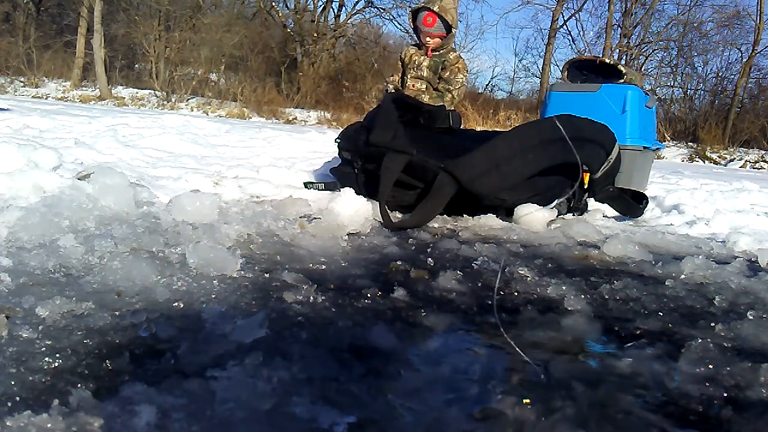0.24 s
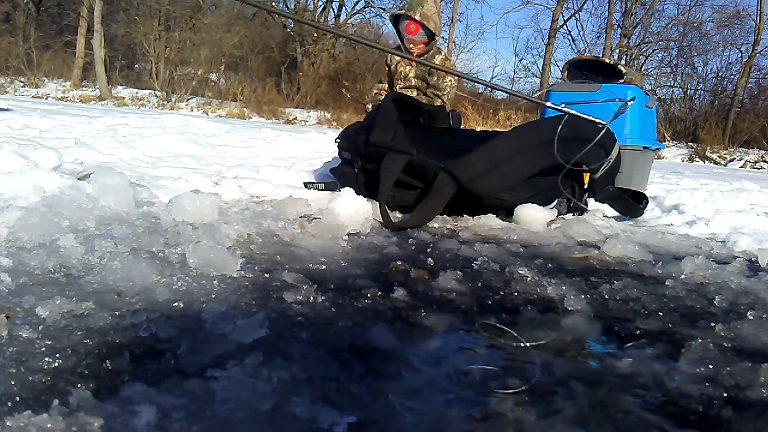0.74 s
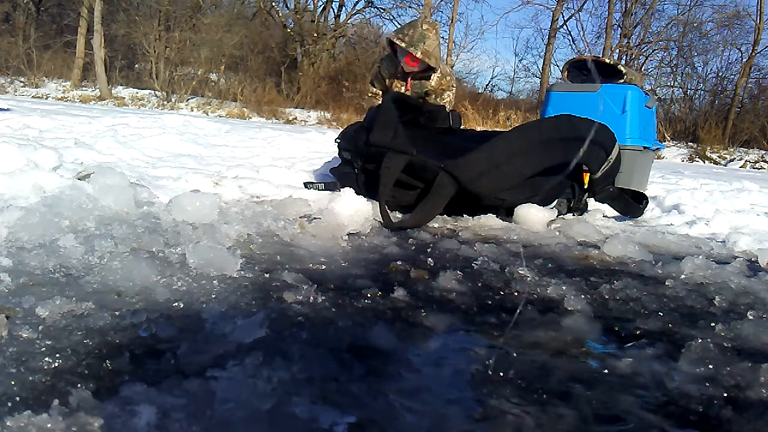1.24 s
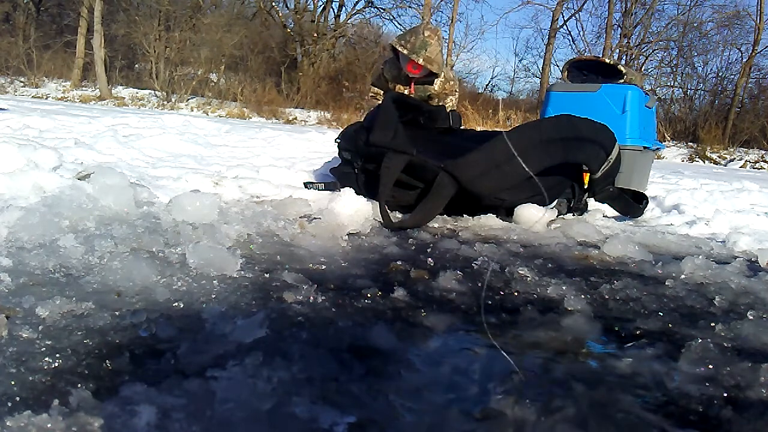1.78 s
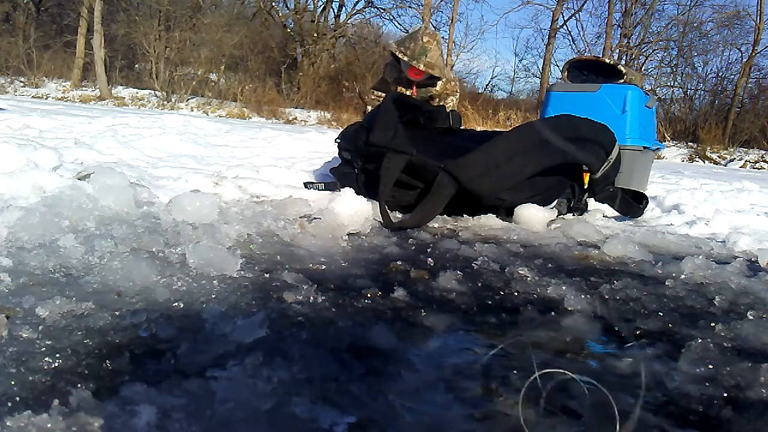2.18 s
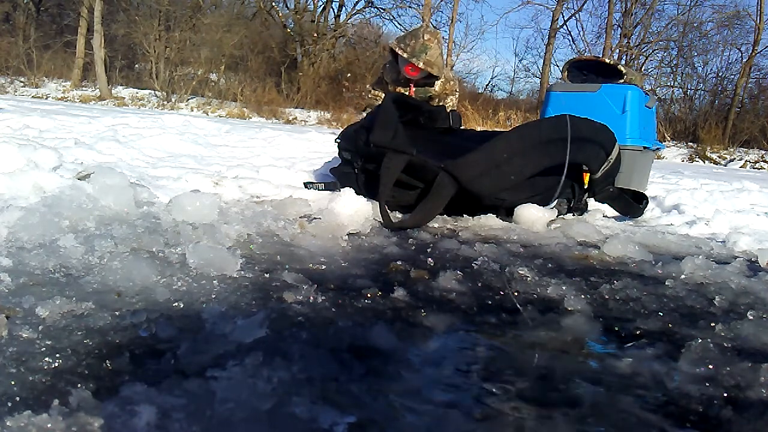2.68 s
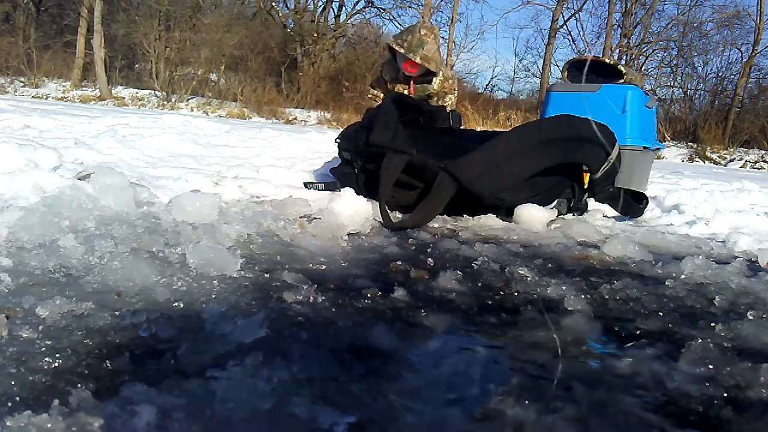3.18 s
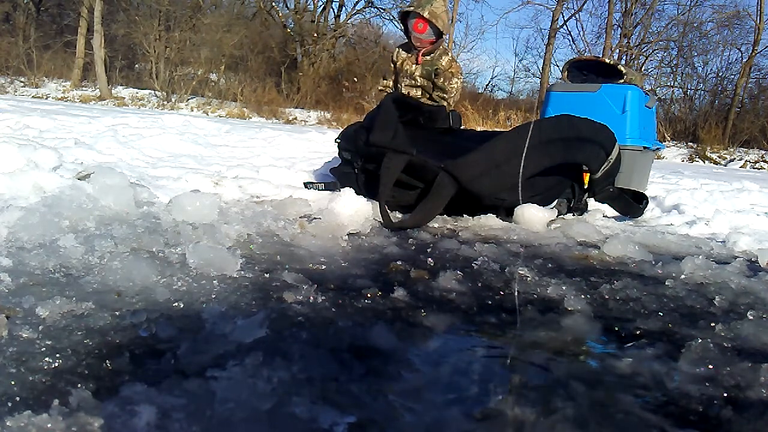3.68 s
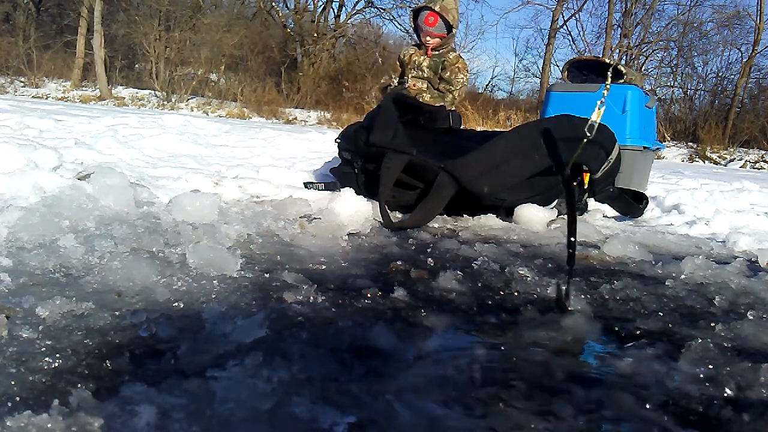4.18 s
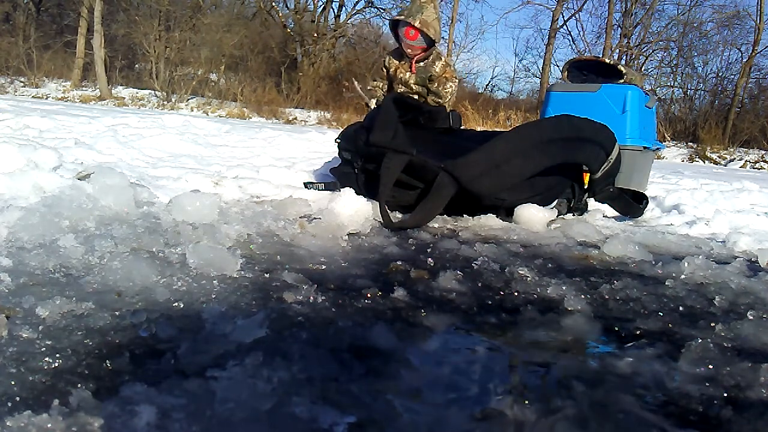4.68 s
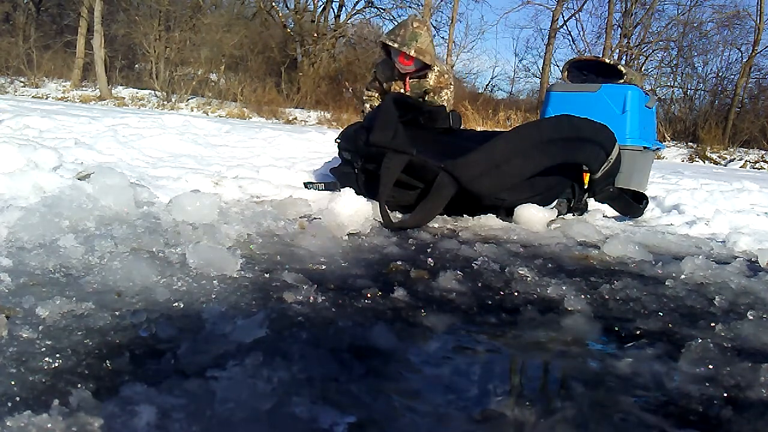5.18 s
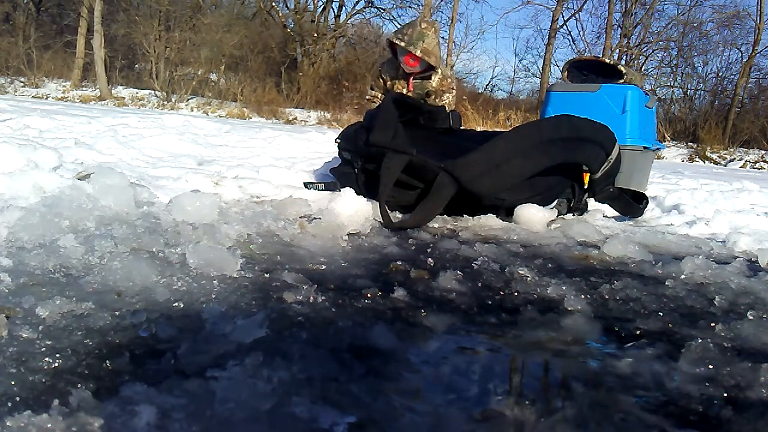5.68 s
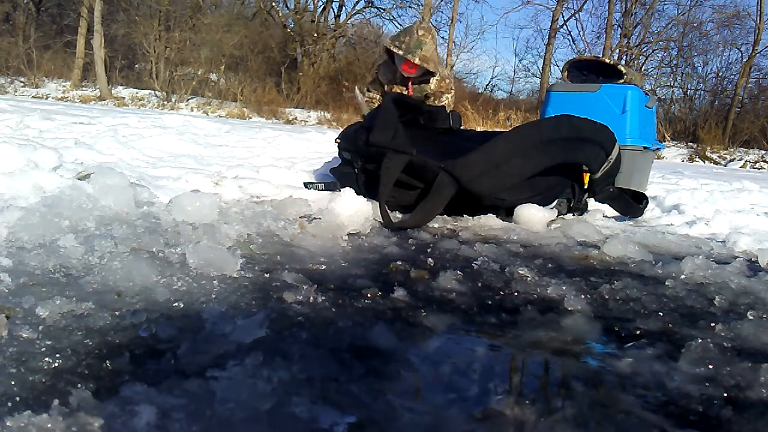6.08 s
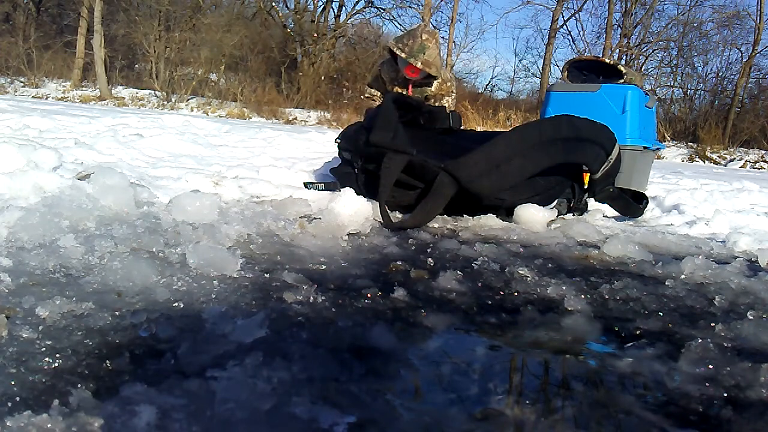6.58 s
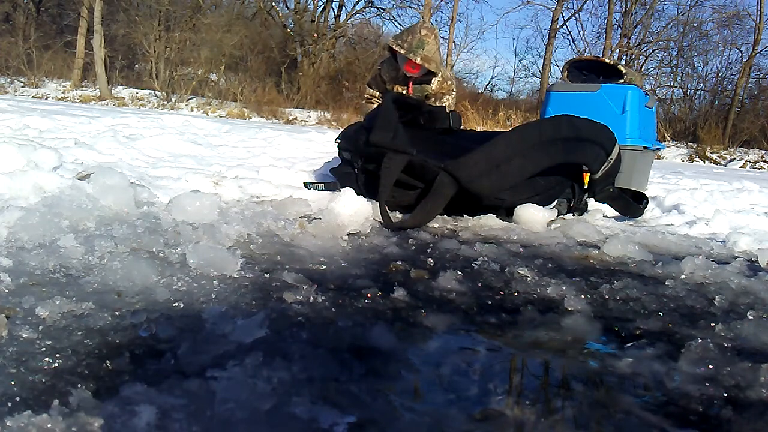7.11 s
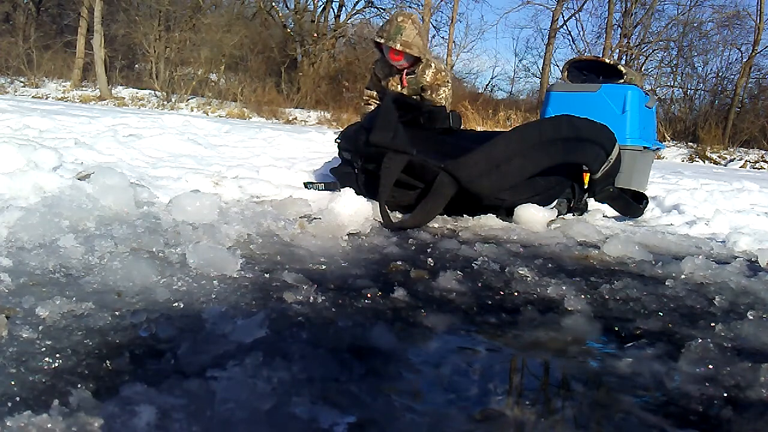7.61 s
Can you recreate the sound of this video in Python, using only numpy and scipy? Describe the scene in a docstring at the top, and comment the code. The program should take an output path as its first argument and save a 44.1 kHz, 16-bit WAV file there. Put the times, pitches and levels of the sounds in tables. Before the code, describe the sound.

Light wind, low open-air murmur and faint ticking ice lie under everything, with a far engine hum and an exhaust drone that fades by about 1.8 s. Soft bumps and swishes of line and clothing come at 0.1-1.1 s. From 1.2 to 3.4 s a steel chisel about four metres off strikes pond ice nine times, some 0.28 s apart, strongest near 2.6 s. Each blow is a quick falling chirp through the ice, then a dry crack, short bar clink, spray of chips and fizzing slush, with a diffuse echo from shore trees. Some blows slip into a second small crunch. A loose chunk knocks at 3.5 s; cloth rustles around 4 s, tackle clinks at 4.15 s, ice bits click at 4.6-5 s. Nine more blows follow from 5.0 to 7.4 s, about 0.3 s apart, with low bumps and a stronger breath of wind near 6.9 s. Slush settles into quiet air.

```python
"""Over light wind, a far engine and faint ice crackle, line and clothing swish and an exhaust drone fades.
From 1.2 s a steel chisel chops pond ice about four metres away: nine blows, a pause, nine more from 5.0 s.
Each blow comes first as a falling chirp, dispersed by the ice sheet, then as a crack through the air.
Decaying bar modes clink; noise bursts give spray, loose chunks and a diffuse answer from the shore trees.
In the pause tackle clinks and bits of ice click; slush swells and settles after each blow."""
import sys
import numpy as np
from scipy import signal
from scipy.fft import rfft, irfft
from scipy.io import wavfile
from scipy.ndimage import uniform_filter1d

SR = 44100
rng = np.random.default_rng(int(sys.argv[2]) if len(sys.argv) > 2 else 0)


def store_wav(level_fs):
    """Save 16-bit WAV to argv[1]."""
    pcm = np.round(np.clip(np.atleast_2d(level_fs), -1, 1) * 32767)
    wavfile.write(sys.argv[1], SR, pcm.T.astype(np.int16))


N = 346185
SIZE = 8192  # samples of one short sound
HZ, AGE_S, CLOCK_S = np.fft.rfftfreq(SIZE, 1 / SR), np.arange(SIZE) / SR, np.arange(N) / SR

# chisel blows, relative levels: crack arrival t/s, ice wave/dB, hardness (wave treble)/dB,
# knock/dB, crack/dB, snap/dB, fizz/dB, bar clink/dB
BLOWS = [(1.191, -31, -12, -37, -48.5, -40.5, -40, -38),
         (1.5089, -33.5, -14, -37, -46, -49.5, -42.5, -36.5),
         (1.7754, -28.5, -5, -25, -42, -37, -39.5, -25.5),
         (2.0465, -29, -11, -29.5, -43.5, -45, -36.5, -31.5),
         (2.3291, -30, -4.5, -37, -34.5, -41, -35.5, -32),
         (2.6059, -23.5, -5.5, -27.5, -27, -29, -31.5, -21), (2.8895, -33, 4, -24, -38, -28, -36, -23),
         (3.1505, -29, -6.5, -27, -35.6, -30, -41.5, -36), (3.416, -34, 1, -26.5, -41.5, -41, -39, -32),
         (5.0154, -32.5, -3, -29, -49, -38, -43, -35.5), (5.3385, -30, -7, -28.5, -49.5, -49, -42.5, -38),
         (5.6464, -26.5, -17.5, -39.5, -29.5, -43, -34.5, -30.5),
         (5.933, -30, -16.5, -40, -43.5, -48.5, -43, -38),
         (6.2256, -29.5, 2.5, -38.5, -38, -42, -35.5, -57), (6.5327, -24.5, 1, -22, -35, -34, -32, -26.5),
         (6.8338, -26.5, -11, -25.5, -41.5, -27.5, -34, -59),
         (7.147, -33, -2, -31, -42.5, -26.5, -30.5, -37), (7.433, -33, 4, -56, -41.5, -27, -36.5, -27.5)]
# open-air murmur spectrum: f/Hz, relative density/dB
AIR = [(71, -55), (120, -28.5), (181, 2.5), (233, -0.5), (270, -1), (353, -1.5), (391, -6), (440, -2),
       (474, -4), (3330, -15), (4100, -12.5), (5330, -78), (9020, -120)]
# hiss spectrum: f/Hz, relative density/dB
HISS = [(200, 10), (4000, 10), (6000, -6), (7800, 7.5), (10000, 3.5), (13000, -1), (16000, -6)]


def gain_of(db):
    """Decibels to amplitude."""
    return 10 ** (np.asarray(db) / 20)


def evened(x):
    """Scales to rms 1."""
    return x / np.sqrt(np.mean(x ** 2) + 1e-20)


def unit(x):
    """Scales to energy 1."""
    return x / (np.linalg.norm(x) + 1e-12)


def read(points, hz):
    """A spectrum, joined by straight lines over log frequency."""
    f, value = np.transpose(points)
    return np.interp(np.log(hz + 1), np.log(f + 1), value)


def curve(rows, t_s, axis=1):
    """One column of a time table at the times t_s."""
    rows = np.array(rows)
    return np.interp(t_s, rows[:, 0], rows[:, axis])


def add(mix, start_s, sound):
    """Adds a sound at start_s."""
    part = mix[max(round(start_s * SR), 0):][:len(sound)]
    part += sound[:len(part)]


def causal(db):
    """Minimum-phase response with these gains: it rings only after its cause."""
    log_gain = np.log(gain_of(np.maximum(db, -100)))
    circle = np.concatenate([log_gain, log_gain[-2:0:-1]])
    return np.exp(np.conj(signal.hilbert(circle)))[:len(db)]


def coloured(x, db):
    """Passes x through a causal filter with gains db."""
    return signal.fftconvolve(x, irfft(causal(db)))[:len(x)]


def grains(spread_db, size=SIZE):
    """Dense clicks of unequal strength, rms 1."""
    strength_db = spread_db * np.minimum(rng.exponential(1, size), 5)
    return evened(rng.standard_normal(size) * gain_of(strength_db))


def wander(size, count):
    """Smooth random curve of rms 1 that changes about every count samples."""
    smooth = uniform_filter1d(rng.standard_normal(size), count)
    return evened(uniform_filter1d(smooth, count))


def noise(db, flutter_db, grain_db=-0.6):
    """Grainy coloured noise, rms 1, whose level flutters at random."""
    steady = coloured(grains(grain_db, size=N), db)
    return evened(steady * gain_of(flutter_db * wander(N, count=500)))


def outdoors(low_db=1.5, upper_db=-0.7, hiss_db=-79, wind_db=2.0, flicker_db=3.5, waver_db=-0.43):
    """Open air and wind on the microphone; low murmur wavers slowly, all but the wind flickers."""
    # murmur course, relative: t/s, low part/dB, upper part/dB
    air_level = [(0.0, -59.5, -62.5), (2.71, -62, -63.5), (4.57, -67.5, -67.5), (5.2, -65.5, -61),
                 (6.91, -66.5, -65.5), (7.85, -68.5, -70)]
    # wind spectrum: f/Hz, relative density/dB
    wind_colour = [(20, -17.5), (40, -11.5), (60, -10), (85, -8), (120, -23.5), (250, -13), (1000, -87)]
    # wind course, relative; strongest near 6.9 s: t/s, level/dB
    wind_level = [(0, -73), (2.4, -72.5), (4.6, -74), (6.2, -71.5), (6.85, -67), (7.85, -81)]
    air = read(AIR, HZ) + read([(60, -11.5), (150, 12.5), (4100, 14), (4600, -29), (9000, -62)], HZ)

    low = noise(air + read([(800, -6.0), (1400, -13.5), (3000, -51.0)], HZ), 0.4)
    low = low * gain_of(curve(air_level, CLOCK_S) + low_db + waver_db * wander(N, count=3000))
    upper = noise(air + read([(400, -19.5), (1100, -10.5)], HZ), 0.36)
    upper = upper * gain_of(curve(air_level, CLOCK_S, axis=2) + upper_db)
    hiss = noise(read(HISS, HZ), 0.55, grain_db=10.0) * gain_of(hiss_db)
    wind = noise(read(wind_colour, HZ), 1.5) * gain_of(curve(wind_level, CLOCK_S) + wind_db)
    flicker = gain_of(flicker_db * wander(N, count=220))
    return (low + upper + hiss) * flicker + wind


def engine(hum_db=6.5):
    """Far engine: a sine at the firing rate, and noise in broad exhaust resonances that fades."""
    # speed drops, later picks up: t/s, firing f/Hz, relative level/dB
    firing = [(0, 85, -76), (1.45, 82, -73), (1.9, 71, -68.5), (3.1, 67, -73), (3.7, 67, -79.5),
              (4.8, 85, -87), (7.85, 76, -86)]
    # exhaust resonances: f/Hz, width/Hz, relative level/dB
    resonances = [(180, 6.3, -7), (272.6, 6.5, -1.5), (394.8, 13, -3)]
    # drone course: t/s, level/dB
    drone_level = [(0, -60), (1.2, -62.5), (1.8, -87), (2.6, -86), (7.85, -87)]
    turns = np.cumsum(curve(firing, CLOCK_S)) / SR
    hum = np.sin(2 * np.pi * turns) * gain_of(curve(firing, CLOCK_S, axis=2) + hum_db)
    pipe = sum(gain_of(db) / (1 + (2 * (HZ - hz) / width_hz) ** 2) for hz, width_hz, db in resonances)
    drone = noise(20 * np.log10(pipe), 0.92) * gain_of(curve(drone_level, CLOCK_S))
    return hum + drone


def crackle(level_db=-70, clicks_per_s=60):
    """Slush and ice tick faintly: random short noise decays."""
    strength_db = 3.5 * np.minimum(rng.exponential(1, N), 2.5)
    clicks = (rng.random(N) < clicks_per_s / SR) * gain_of(strength_db)
    ticks = signal.fftconvolve(clicks, np.exp(-AGE_S / 0.0012))[:N] * rng.standard_normal(N)
    colour = [(150, -7), (500, 7), (3800, 15.5), (6000, -26), (8000, 1.5), (16000, -10)]
    return gain_of(level_db) * evened(coloured(ticks, read(colour, HZ)))


def swishes():
    """Line and clothing brush by: each stroke is one arch of grainy hiss over a soft rustle."""
    # strokes: top t/s, length/s, hiss/dB, rustle/dB
    strokes = [(0.224, 0.19, -68, -63), (0.657, 0.42, -66.5, -59), (1.07, 0.14, -60.5, -49),
               (3.924, 0.088, -67, -56), (4.175, 0.4, -63, -58)]
    hiss, rustle = np.zeros((2, N))
    for top_s, length_s, hiss_db, rustle_db in strokes:
        arch = np.hanning(round(length_s * SR))
        add(hiss, top_s - length_s / 2, gain_of(hiss_db) * arch)
        add(rustle, top_s - length_s / 2, gain_of(rustle_db) * arch)
    hiss = hiss * noise(read(HISS, HZ), 2.5, grain_db=6.0)
    return hiss + rustle * noise(read(AIR, HZ) + read([(400, 1.5), (3000, -6)], HZ), 4.5)


def small_sounds(tick_db=38.0, tick_decay_s=0.0063, bump_decay_s=0.0036):
    """Bits of ice click as decaying noise; dull bumps are short pushes through a narrow band."""
    # ice clicks, relative levels: t/s, low/dB, middle/dB, high/dB
    clicks = [(4.622, -50, -48, -62.5), (4.661, -64, -64, -73), (4.736, -56, -57.5, -82),
              (4.959, -54, -61, -88), (5.168, -53, -54, -58.5), (5.496, -60, -52, -70),
              (5.532, -77, -52, -68), (7.554, -56, -64, -76)]
    # dull bumps: t/s, peak/dB, f/Hz
    bumps = [(0.079, -49, 149), (.09, -48.5, 68), (0.258, -54, 66), (6.341, -51, 59), (6.669, -40.5, 200),
             (6.679, -46, 67), (6.932, -47.5, 59), (6.979, -50.5, 62), (7.241, -51.5, 54)]
    out = np.zeros(N)
    for s, low, middle, high in clicks:
        colour = [(100, low - 25), (650, low + 3), (1600, middle - 3), (3600, middle),
                  (6000, high - 9), (8000, high), (11000, high - 9), (16000, high - 14)]
        burst = unit(grains(0.79) * np.exp(-AGE_S / tick_decay_s))
        add(out, s, coloured(burst, tick_db + read(colour, HZ)))
    for s, db, hz in bumps:
        push = grains(0.72) * AGE_S / bump_decay_s * np.exp(-AGE_S / bump_decay_s)
        thud = coloured(push, read([(hz / 3, -28), (hz, 0), (hz * 3, -30), (hz * 10, -70)], HZ))
        add(out, s, gain_of(db) * thud / abs(thud).max())
    return out


def loose_bits(clink_decay_s=0.0025, chunk_decay_s=0.0019):
    """Tackle clinks on a close pair of modes; loose chunks land with a short knock."""
    # metal tackle on the line: t/s, relative level/dB, upper mode f/Hz
    tackle = [(.799, -55, 7900), (4.156, -39, 8230)]
    # chunks knocking down after a blow: t/s, peak/dB
    chunks = [(1.211, -32), (3.4768, -32), (5.085, -35), (6.866, -33)]
    # chunk spectrum: f/Hz, relative level/dB
    chunk_colour = [(150, -5), (420, 13.5), (700, 14.5), (1100, 3), (1800, -13), (3800, -15), (7500, -11),
                    (16000, -16)]
    out = np.zeros(N)
    for s, db, hz in tackle:
        pair = np.sin(2 * np.pi * hz * AGE_S) + np.sin(2 * np.pi * hz * 0.93 * AGE_S)
        add(out, s, gain_of(db) * pair * np.exp(-AGE_S / clink_decay_s) * (1 - np.exp(-AGE_S / .002)))
    for s, db in chunks:
        knock = coloured(grains(1.1) * np.exp(-AGE_S / chunk_decay_s), read(chunk_colour, HZ))
        add(out, s, gain_of(db) * knock / abs(knock).max())
    return out


def slush(level_db=-65, peak_s=0.08):
    """Each blow stirs the slush, whose fizz swells to a top after peak_s and settles; powers add."""
    # slush spectrum: f/Hz, relative density/dB
    slush_colour = [(120, -14), (250, 3), (700, -1), (1500, -14), (3800, -14), (6000, -11), (8000, -3),
                    (16000, -11.5)]
    age = np.arange(SR) / SR / peak_s
    power = np.zeros(N)
    for s, *_ in BLOWS:
        add(power, s, (age * np.exp(1 - age)) ** 2)
    fizzing = noise(read(slush_colour, HZ), 2.5, grain_db=4)
    return gain_of(level_db) * np.sqrt(power) * fizzing


def shore(x, echo_db=-21.0, size=256):
    """Trunks and branches scatter each blow into a diffuse echo: noise shaped by its delayed power."""
    # echo spectrum: f/Hz, relative level/dB
    shore_colour = [(200, -8), (700, -6), (1500, -3), (2700, 5.5), (4000, 1.5), (6000, -8.5), (8000, 0.5),
                    (15000, 4.5)]
    # echo course: t/s, relative level/dB
    shore_course = [(0, -22), (.04, 25.5), (.07, 16), (.125, 25.5), (.15, 14), (.18, 6.5), (.3, -29),
                    (.6, -58.5)]
    hz, t_s, z = signal.stft(x, SR, nperseg=size)
    course = unit(gain_of(curve(shore_course, t_s[t_s < shore_course[-1][0]])))
    blurred = uniform_filter1d(abs(z) ** 2, size=7, axis=0)
    power = signal.fftconvolve(blurred, course[None] ** 2, axes=1)[:, :len(t_s)]
    scatter = signal.stft(grains(2.0, size=N), SR, nperseg=size)[2]
    echo = scatter * np.sqrt(abs(power) / np.mean(abs(scatter) ** 2))
    echo = echo * gain_of(echo_db + read(shore_colour, hz))[:, None]
    return signal.istft(echo, SR, nperseg=size)[1][:N]


def chips(clump_db=-0.5, splinter_share=0.37, splinters_per_s=700):
    """Fine spray scatters over the ice in clumps, with sparser splinters among it."""
    # spray spectrum: f/Hz, relative level/dB
    chip_colour = [(300, -4.5), (800, 3), (1600, -19.5), (3000, -11.5), (3900, 8), (5600, -3), (7600, 1.5),
                   (10000, -5.5), (13000, -14.5), (16000, -15)]
    # spray course after the blow: t/s, relative level/dB
    spray = [(0, -32), (.009, 1), (.017, 1), (.03, 5.5), (.045, -4.5), (.065, -16), (.12, -40)]
    specks = grains(3.6)
    dust = specks * gain_of(clump_db * wander(SIZE, count=110))
    splinters = evened(rng.standard_normal(SIZE) * (rng.random(SIZE) < splinters_per_s / SR))
    mixed = coloured(dust + splinter_share * splinters, read(chip_colour, HZ))
    return evened(mixed) * gain_of(curve(spray, AGE_S))


def bar(clink_db, snap_db, ping_db=-4, ping_growth=5, hard_snap_db=-28):
    """Bar modes damped by hands and ice; grip shifts the low ones, a sharp snap wakes the upper ones."""
    # steel bar modes: nominal f/Hz, relative level/dB, t60/s
    modes = [(1815, -16, .05), (2525, -13, .05), (3680, -11, .025), (3880, -1, .035), (4000, -3, .03),
             (5400, -2, .04), (5610, -2, .04), (7380, -12, .09), (8180, -9, .08), (9200, -14, .07),
             (11540, -18, .06), (11940, -15, .07), (13500, -18, .04), (13750, -18, .04)]
    hz, db, t60_s = np.transpose(modes)[:, :, None]
    upper = hz > 4700
    ping_drive_db = hard_snap_db + ping_db + ping_growth * (snap_db - hard_snap_db)
    drive_db = np.where(upper, ping_drive_db, clink_db)
    detune, uneven, phase = rng.standard_normal((3, len(modes), 1))
    mode_hz = hz * (1 + np.where(upper, .0016, .009) * detune)
    level = gain_of(drive_db + db + 0.52 * uneven - 60 * AGE_S / t60_s)
    ringing = level * np.sin(2 * np.pi * (mode_hz * AGE_S + phase))
    return ringing.sum(0) * (1 - np.exp(-AGE_S / 0.00085)) ** 2


def fracture(levels_db, rise_s=0.0013, crumble_s=0.0067, crumble_share=0.34, lump_db=2):
    """The edge bites: an uneven burst of tiny cracks, then brief crumbling."""
    # centres of knock, crack, snap and fizz: f/Hz
    centres_hz = [800, 2400, 6000, 10000]
    # fracture spectrum: f/Hz, relative level/dB
    fracture_colour = [(60, 6), (150, 16), (450, 39.5), (800, 33.5), (1250, 41), (1550, 30.5), (2400, 37.5),
                       (3500, 40.5), (5500, 37), (6500, 36), (8200, 37), (10000, 29.5), (13000, 17),
                       (16000, 18.5)]
    bite = (AGE_S / rise_s) ** 2 * np.exp(-AGE_S / rise_s)
    crumbling = crumble_share * np.exp(-AGE_S / crumble_s) * (1 - np.exp(-AGE_S / rise_s)) ** 2
    cracks = grains(1.1)
    burst = unit(cracks * (bite + crumbling) * gain_of(lump_db * wander(SIZE, count=30)))
    return coloured(burst, read(fracture_colour, HZ) + read(list(zip(centres_hz, levels_db)), HZ))


def slips():
    """After some blows the edge slips deeper: a smaller fracture and one more bar clink."""
    # slips: t/s, crunch/dB, bar clink/dB
    bites = [(1.5157, -64, -33.5), (1.7865, -58, -32.5), (2.3378, -58, -31), (2.6111, -62, -31),
             (2.898, -35, -25.5), (3.160, -54, -30.5), (3.4251, -35.5, -25), (6.866, -42.5, -47),
             (7.163, -39, -49)]
    # offsets from the crunch level: knock/dB, crack/dB, snap/dB, fizz/dB
    slip_colour = [3.5, -10.5, -7, -14]
    out = np.zeros(N)
    for s, crunch, clink in bites:
        add(out, s, fracture(crunch + np.array(slip_colour)) + bar(clink, crunch))
    return out


def far_return(delay_s=0.042, width_s=0.0079, centre_hz=311, level_db=-11.5):
    """Soft low thud from farther across the sheet: only a narrow band survives the way and back."""
    late_s = AGE_S - delay_s
    thud_hz = centre_hz * rng.normal(1, 0.04)
    return gain_of(level_db) * np.exp(-(late_s / width_s) ** 2) * np.cos(2 * np.pi * thud_hz * late_s)


def slab(wave):
    """The passing wave sets off the brief modes of the slab around the hole."""
    # slab modes: f/Hz, width/Hz, relative level/dB
    slab_modes = [(262.4, 45, -6), (393.6, 12, -4), (504, 43, 4), (660, 63, -2.5), (818, 83, -11.5)]
    ringing = np.zeros(SIZE)
    for hz, width_hz, db in slab_modes:
        decay = 2 * np.pi * width_hz / SR * np.exp(-np.pi * width_hz * AGE_S)
        ringing += gain_of(db) * decay * np.cos(2 * np.pi * hz * AGE_S)
    return unit(wave + signal.fftconvolve(wave, ringing)[:SIZE])


def ice_wave(metres, hardness_db, top_speed_m_per_s=1200, lag_s_per_m=.0032, bend_hz=270,
             start_turns=0.39, scatter=0.7, treble_db=5, passing_hz=235):
    """Low bending waves lag behind high ones, so a blow spreads into a falling chirp."""
    # bending wave spectrum: f/Hz, relative level/dB
    wave_colour = [(60, -26), (130, -32), (190, -2.5), (260, 5.5), (340, 5.5), (430, -9.5), (520, -5.5),
                   (800, -9), (1100, -26.5), (1700, -28.5), (2700, -33), (4200, -47.5), (6000, -51),
                   (16000, -55)]
    # returns from cracks and edges: nominal extra path/m, relative signed share, half-amplitude f/Hz
    ice_echoes = [(3.2, -0.095, 780), (6.5, -0.32, 1950), (11.2, 0.13, 1600)]
    treble = (hardness_db + treble_db) * read([(330, 0.01), (750, 0.89)], HZ)
    blow = causal(read(wave_colour, HZ) + treble)
    # the edge bites in several tiny steps, which roughens the upper part of the chirp
    steps = rfft(unit(grains(2.5) * np.exp(-AGE_S / .003)))
    roughness = read([(250, 0.53), (700, 2.2), (2500, 4.5), (8000, 6)], HZ)
    blow = blow * (1 + scatter * steps * roughness)

    turns_per_metre = HZ / top_speed_m_per_s + lag_s_per_m * bend_hz * np.arctan(HZ / bend_hz)
    paths = 1 + 0j
    # the longest waves pass the cracks and do not return
    reflected = 1.28 / (1 + (passing_hz / (HZ + 1)) ** 6)
    for extra_m, share, top_hz in ice_echoes:
        extra_turns = turns_per_metre * extra_m * rng.normal(1, .004)
        echo = share * reflected * np.exp(-2j * np.pi * extra_turns)
        paths = paths + echo / (1 + (HZ / top_hz) ** 4)
    travel = np.exp(2j * np.pi * (start_turns - turns_per_metre * metres))
    return unit(irfft(blow * paths * travel))


def chopping(wave_db=30, bar_db=5, chips_db=-12.0, sound_m_per_s=343):
    """Every blow: the ice wave outruns the air sound; a brighter fracture throws more chips."""
    # chisel stays put, then works away during the last blows: t/s, distance/m
    distance = [(5.7, 3.6), (7.1, 4.25)]
    out = np.zeros(N)
    for s, wave, hardness, knock, crack, snap, fizz, clink in BLOWS:
        metres = curve(distance, s)
        struck_s = s - metres / sound_m_per_s
        add(out, struck_s, gain_of(wave + wave_db) * slab(ice_wave(metres, hardness)))
        add(out, s, fracture([knock, crack, snap, fizz]) + gain_of(wave) * far_return())
        spray = gain_of((snap + fizz) / 2 + chips_db) * chips()
        add(out, s, gain_of(bar_db) * bar(clink, snap) + spray)
    return out


def scene():
    """Blows, their echo and the surroundings."""
    blows = chopping() + slips()
    ice = blows + shore(blows) + slush()
    details = small_sounds() + loose_bits() + swishes()
    return (ice + details + outdoors() + crackle() + engine())[None]


def record(dry, self_noise_db=-76.5, edge_hz=16100):
    """Microphone response, a faint self-noise and a band limit."""
    # bass roll-off and a steep notch whose edges ring: f/Hz, gain/dB
    response = [(20, -4), (36, -4.5), (52, 0), (3950, -3.5), (4120, -7.5), (4350, -20), (4650, -23.5),
                (4950, -15), (5150, -12), (5350, -1), (16000, -0.5)]
    hiss = noise(read([(100, -0.5), (4500, 0.5), (16000, -2.5)], HZ), 1.2)
    x = coloured(dry[0], read(response, HZ)) + gain_of(self_noise_db) * hiss
    low_pass = signal.firwin(255, edge_hz, window=("kaiser", 8), fs=SR)
    return signal.oaconvolve(x, low_pass, "same")[None]


dry = scene()
out = record(dry)
store_wav(out)
```